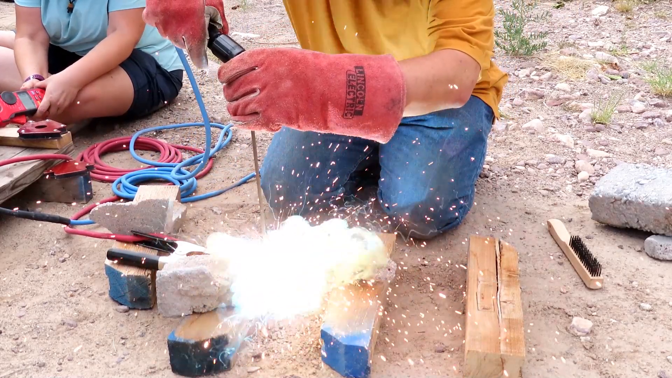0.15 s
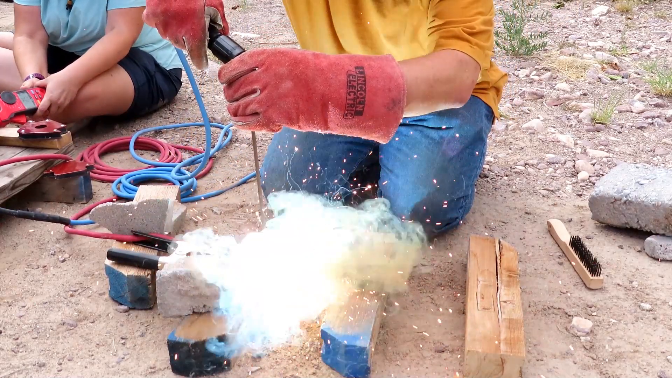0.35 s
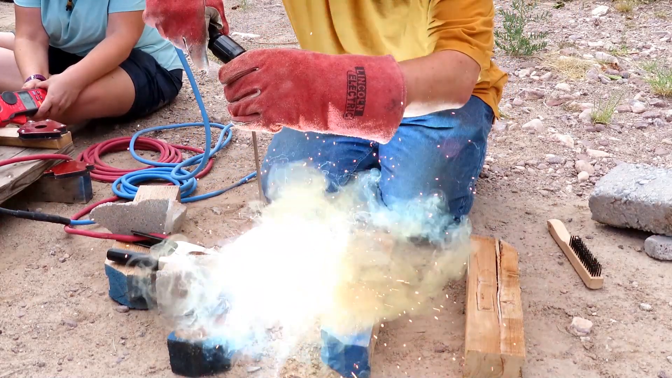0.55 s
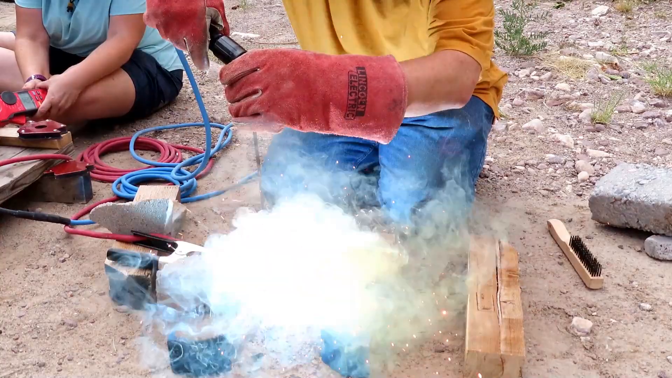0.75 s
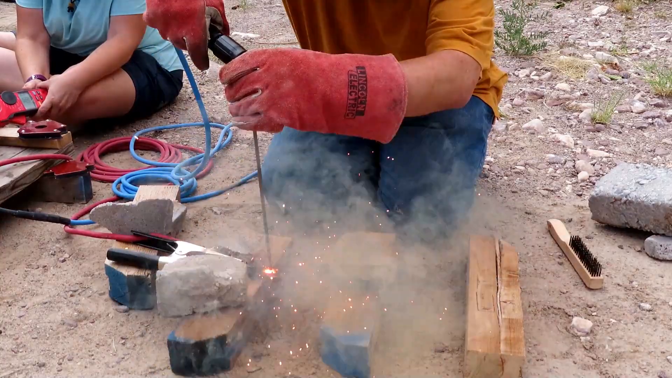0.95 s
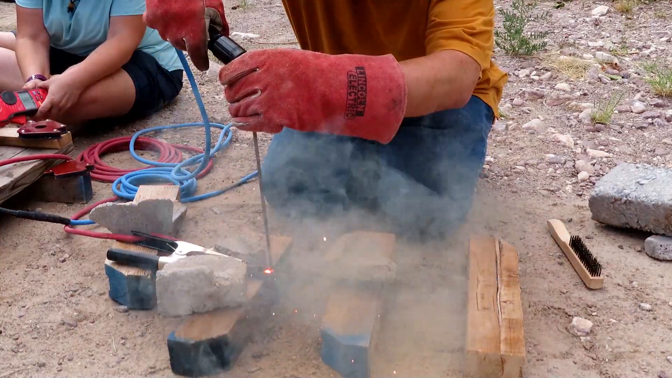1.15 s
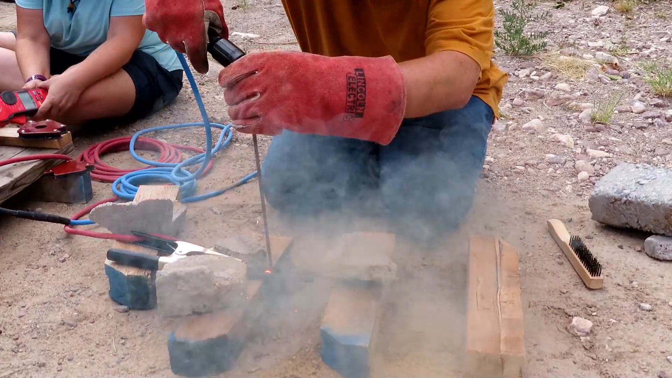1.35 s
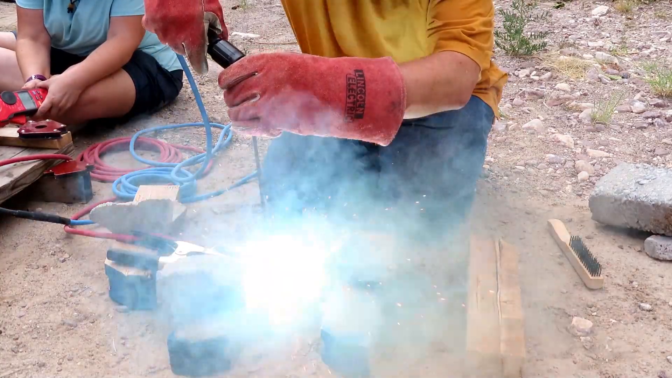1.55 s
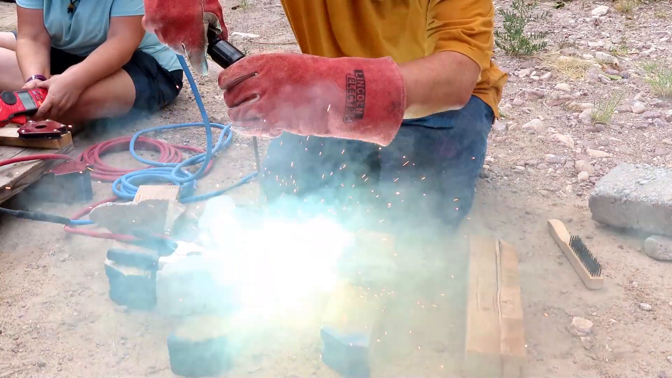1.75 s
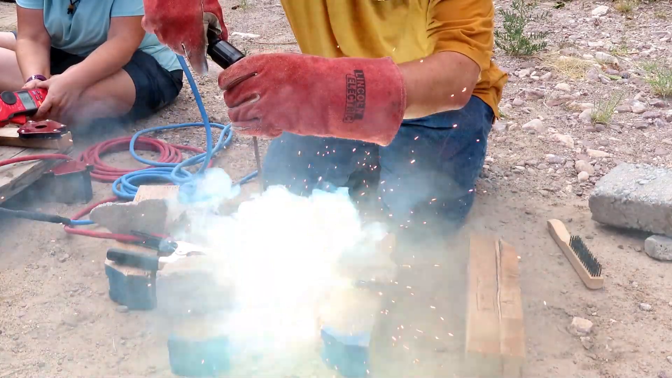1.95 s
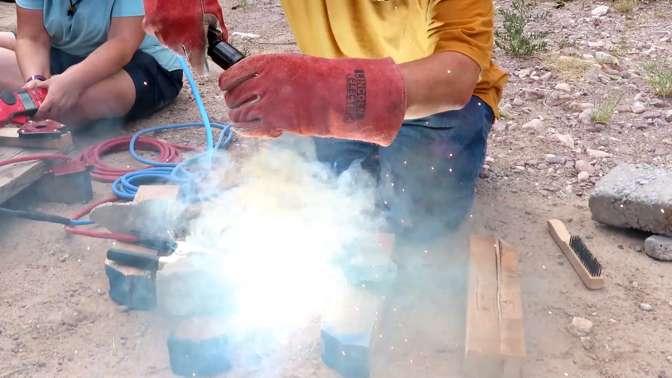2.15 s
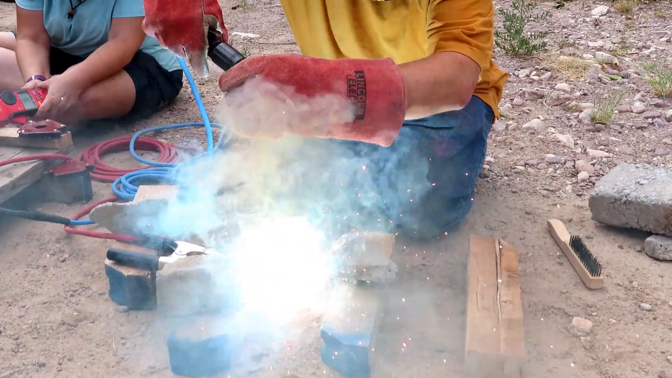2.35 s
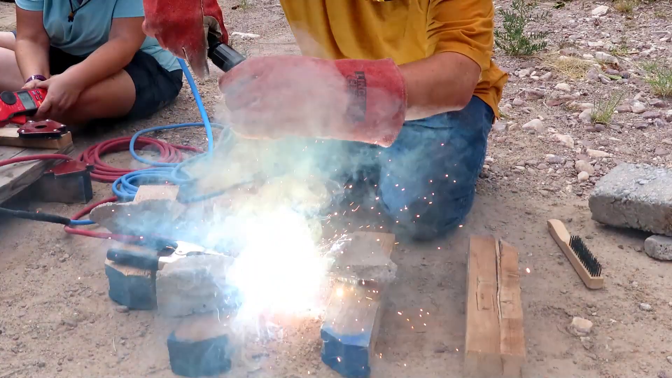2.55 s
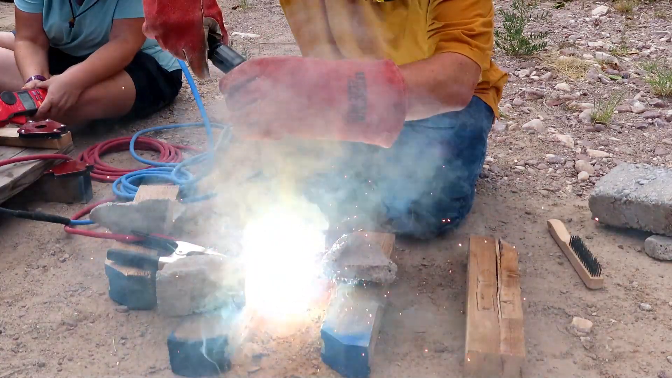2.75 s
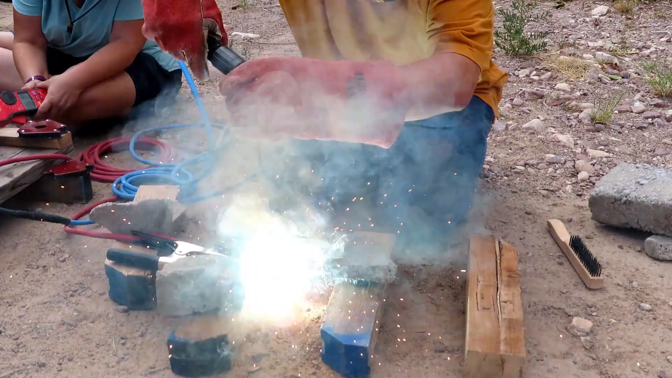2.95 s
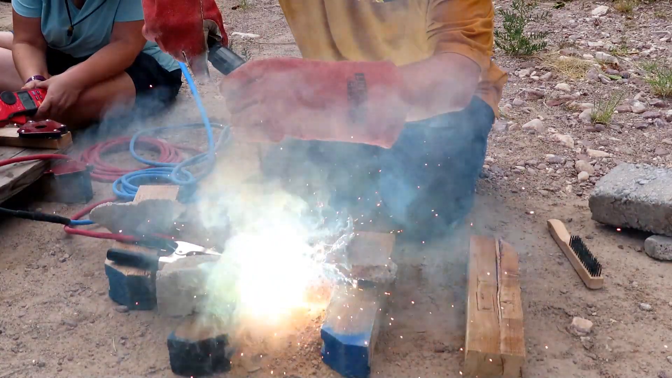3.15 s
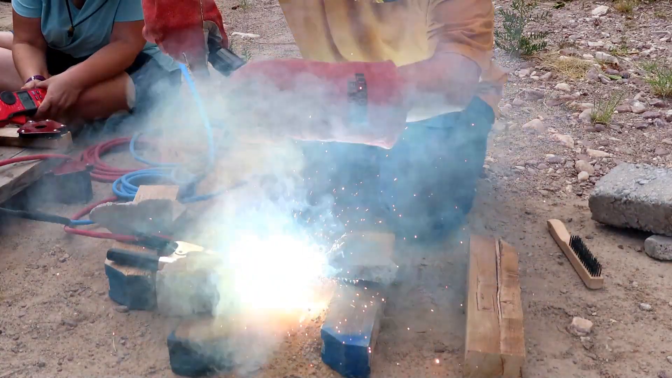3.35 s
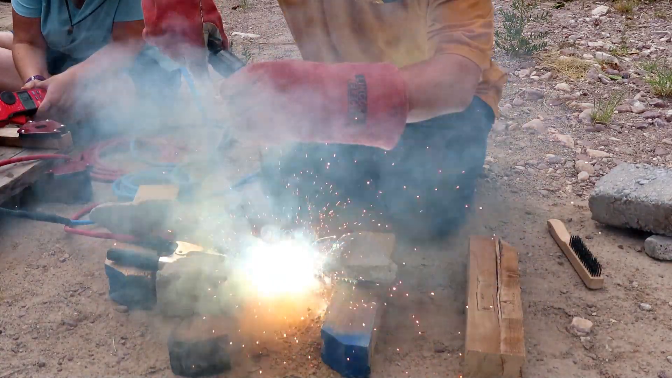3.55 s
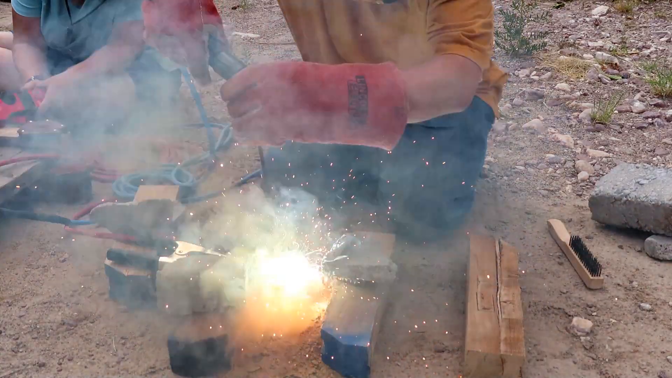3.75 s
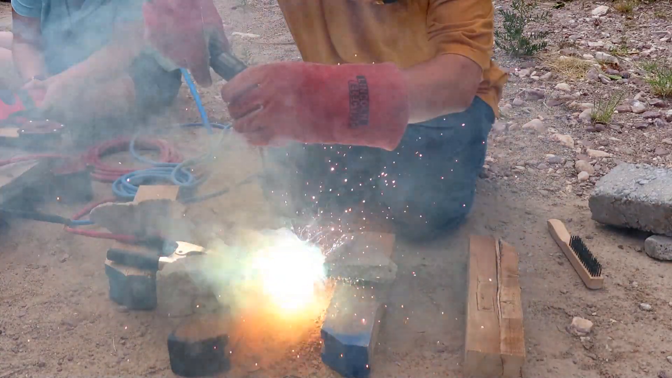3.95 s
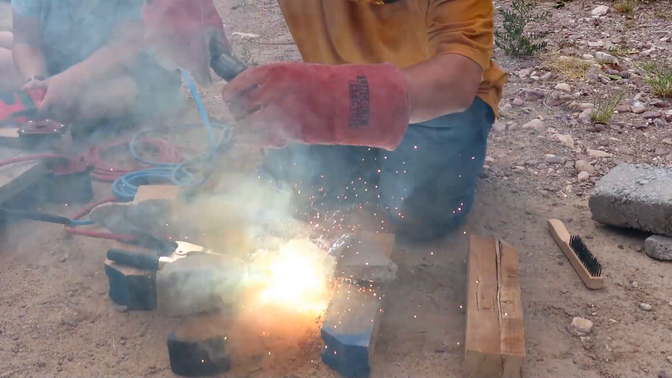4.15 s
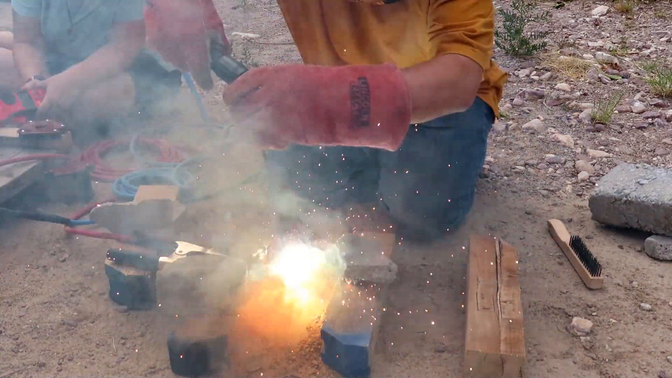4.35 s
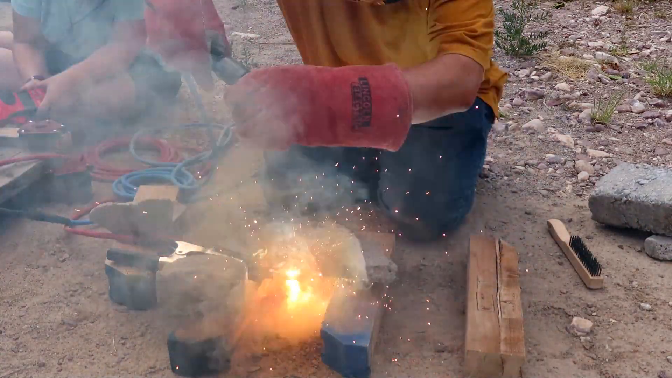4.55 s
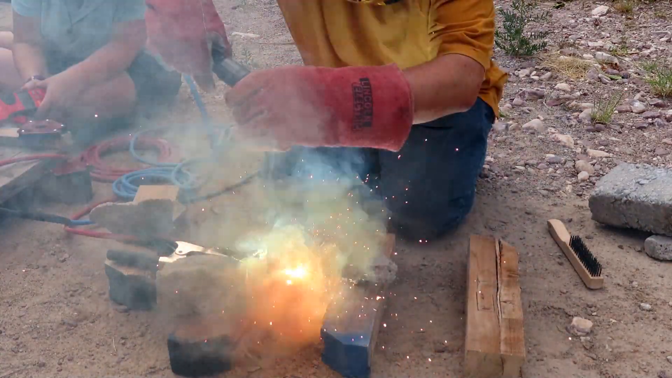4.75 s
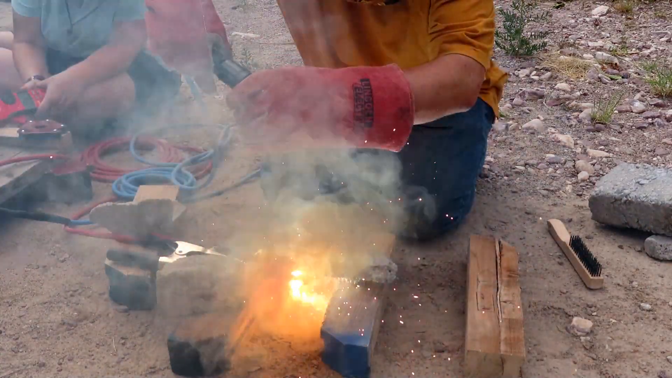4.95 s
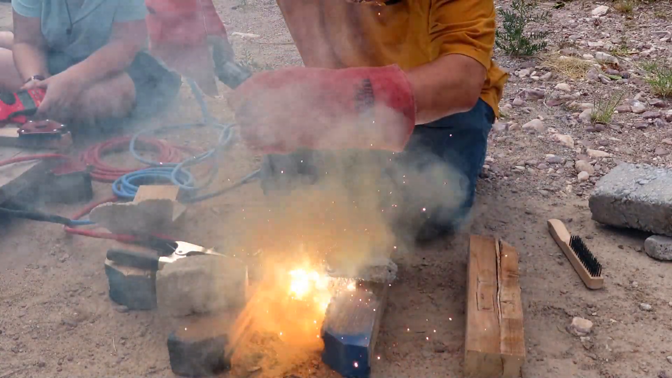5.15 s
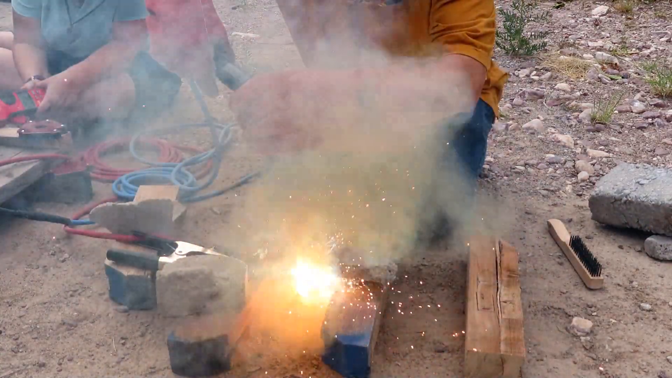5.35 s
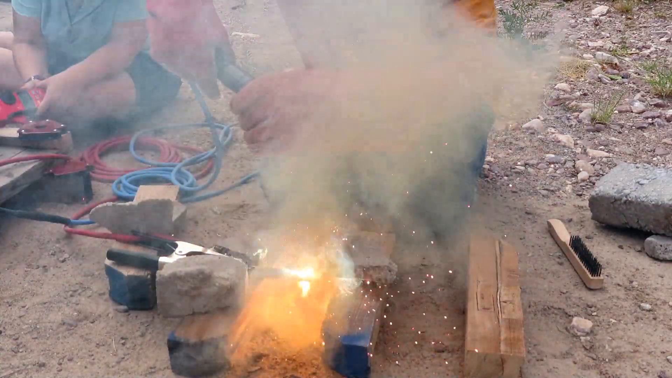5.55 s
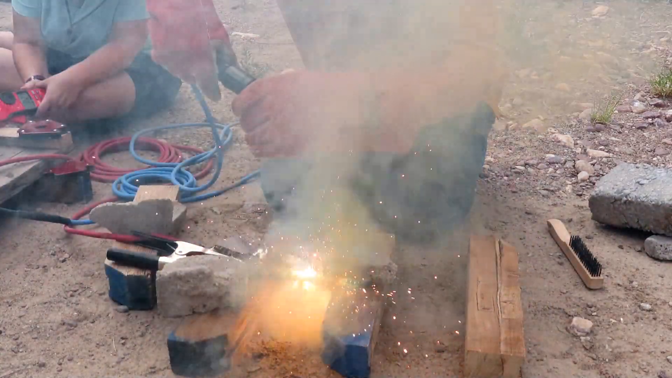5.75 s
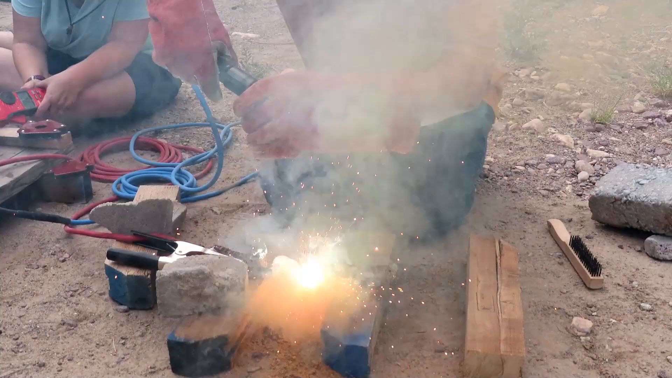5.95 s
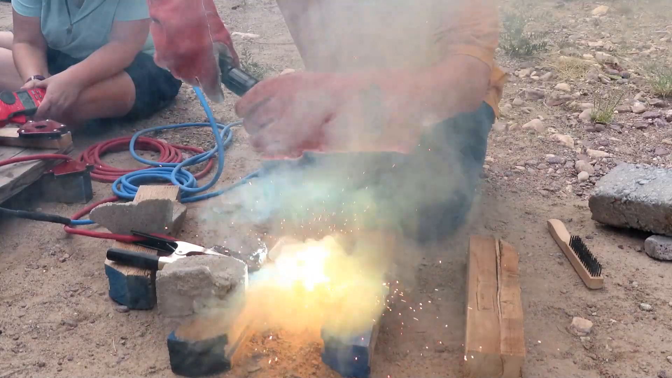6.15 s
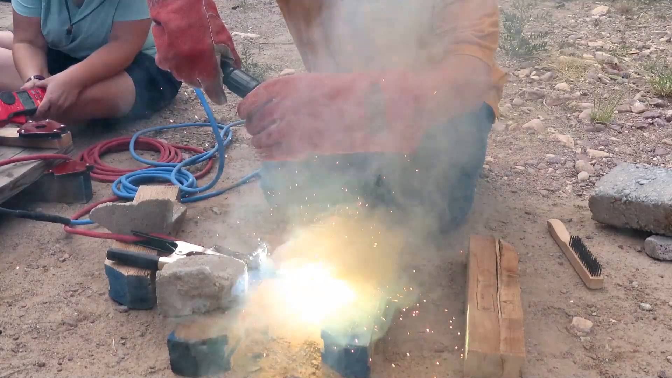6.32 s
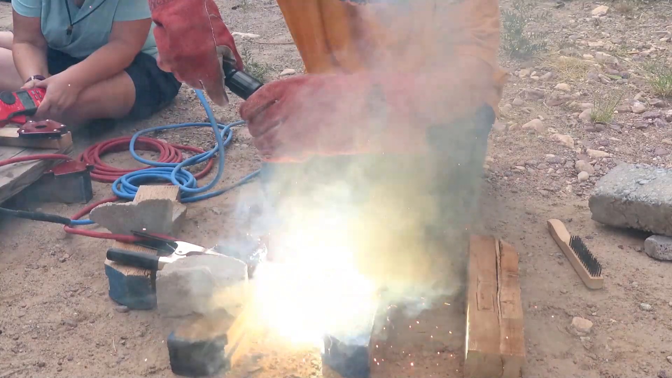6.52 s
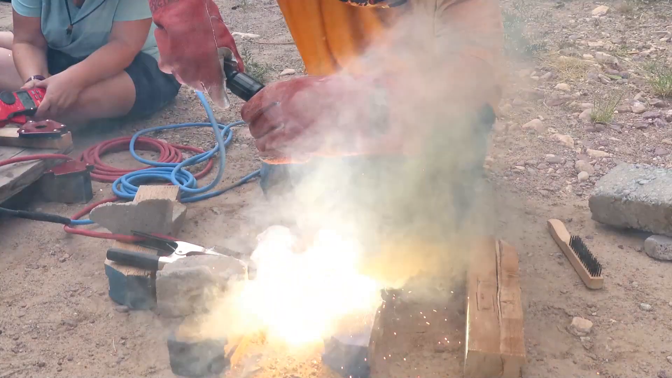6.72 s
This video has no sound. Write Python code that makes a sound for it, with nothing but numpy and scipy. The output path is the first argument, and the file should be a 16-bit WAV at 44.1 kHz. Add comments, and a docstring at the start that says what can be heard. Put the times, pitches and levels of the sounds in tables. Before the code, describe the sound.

An electric welding arc fizzes and crackles harshly up close outdoors, pops out, restrikes after half a second, then fries on steadily with spits.

```python
"""Stick welding outdoors

Steel bars between bricks on bare ground are welded a step or two away, over air and a low drone.
Dense random discharges drive fizz, crackle and a hollow roar; flutter, spits and shorts vary their level.
The arc goes out with a pop, is struck again and settles into a steady frying. Pops are short blasts with
spray and gas; echoes and scatter place arc and pops in the yard."""
import sys
import numpy as np
from scipy import signal
from scipy.fft import rfft, irfft
from scipy.io import wavfile
from scipy.ndimage import uniform_filter1d

SR = 44100
rng = np.random.default_rng(int(sys.argv[2]) if len(sys.argv) > 2 else 0)


def log_audio(samples):
    """Write samples as a 16-bit WAV file to the path given in sys.argv[1]."""
    # one column per channel
    frames = np.atleast_2d(samples).T
    # limit to full scale, then quantise
    limited = np.clip(frames, -1, 1)
    pcm = np.round(limited * 32767).astype(np.int16)
    wavfile.write(sys.argv[1], SR, pcm)


N = 303408
TIME = np.arange(N) / SR

# Colour of the arc. Each row: frequency in Hz, relative gain in dB.
ARC_COLOUR = [(30, -51), (70, -6.5), (110, -2.5), (160, -2), (270, 1.5), (390, 2), (600, 7.5), (950, 2),
              (1900, 0.5), (3300, -4), (5000, -4.5), (8000, -7.5), (12500, -9.5), (16000, -17)]
# Hollow between bricks and ground. Each row: resonance in Hz, width in Hz, relative gain in dB.
HOLLOW_MODES = [(197, 95, 5), (322, 35, -7.5), (474, 133, -3.5), (661.5, 48, 8.5), (876, 31, 1)]


def amp(db):
    """Decibels to gain."""
    return 10 ** (np.asarray(db) / 20)


def evened(x):
    """Scales to rms 1."""
    return x / np.sqrt(np.mean(x ** 2) + 1e-20)


def read(points, hz):
    """Reads a spectrum table on a log-frequency axis."""
    f, value = np.transpose(points)
    return np.interp(np.log(hz + 1), np.log(f + 1), value)


def curves(rows):
    """Every column of a timed table, sample by sample."""
    s, *columns = np.transpose(rows)
    return [np.interp(TIME, s, c) for c in columns]


def wander(lo_hz, hi_hz):
    """Random motion of rms 1, mostly between two rates."""
    hz = np.fft.rfftfreq(N, 1 / SR)
    weight = hz / (hz + lo_hz) / (1 + (hz / hi_hz) ** 2)
    return evened(irfft(rfft(rng.standard_normal(N)) * weight, N))


def coloured(x, points, size=4096):
    """Minimum-phase filter with the given spectrum: clicks keep their sharp fronts."""
    log_gain = np.log(amp(read(points, abs(np.fft.fftfreq(size, 1 / SR)))))
    taps = np.fft.ifft(np.exp(np.conj(signal.hilbert(log_gain)))).real
    return signal.oaconvolve(x, taps[:size // 2])[:N]


def below(x, hz, order=3):
    """Low-pass without delay, so that bands add up again."""
    sos = signal.butter(order, hz, fs=SR, output="sos")
    return signal.sosfiltfilt(sos, x, padtype=None)


def resonate(x, hz, width_hz):
    """A resonance of gain 1 that can follow a moving frequency."""
    turn = np.exp(2j * np.pi * np.cumsum(hz * np.ones(N)) / SR)
    r = np.exp(-np.pi * width_hz / SR)
    return 2 * (turn * signal.lfilter([1 - r], [1, -r], x / turn + 1e-18)).real


def in_hollow(x):
    """Parallel resonances of the hollow between bricks and ground."""
    return sum(amp(db) * resonate(x, hz, width_hz) for hz, width_hz, db in HOLLOW_MODES)


def add(mix, s, sound):
    """Lays a sound into the mix at s seconds."""
    part = mix[max(round(s * SR), 0):][:len(sound)]
    part += sound[:len(part)]


def chance(per_s):
    """Unit clicks at random moments."""
    return 1. * (rng.random(N) < per_s / SR)


def spells_db(rows):
    """A level that holds each row's dB for its length, with edges of a few milliseconds."""
    steps_db = sum(db * ((TIME > s) & (TIME < s + length_s)) for s, length_s, db in rows)
    return uniform_filter1d(steps_db, size=200)


def background():
    """Outdoor air as coloured noise, a drone of wavering harmonics that throbs the air, and a steady hiss."""
    # Each row: frequency in Hz, relative gain in dB.
    air_colour = [(20, -2), (45, -15), (85, -1.5), (150, -19.5), (190, -15.5), (270, -27.5), (900, -29.5),
                  (1800, -36.5), (2900, -48.5), (4200, -51), (6000, -63.5), (15000, -74.5)]
    # Each row: multiple of the throb rate, rms level in dB.
    drone_partials = [(3, -61), (4, -69.5), (5, -70.5)]
    air_db, hiss_db = -53, -83
    throb_hz, throb_depth, waver = 23.06, 0.4, 0.017
    turn = 2 * np.pi * np.cumsum(throb_hz * (1 + waver * wander(0.41, 5.9))) / SR
    air = amp(air_db) * evened(coloured(rng.standard_normal(N), air_colour))
    throb = throb_depth * np.cos(turn) * below(air, 700)
    drone = sum(amp(db) * evened(np.sin(round(k) * turn + 2 * np.pi * rng.random()))
                for k, db in drone_partials)
    return air + throb + drone + amp(hiss_db) * rng.standard_normal(N)


def scatter(t60_s):
    """A quick spray of small reflections, energy 1; small things scatter only short waves."""
    t = np.arange(SR // 10) / SR
    hits = rng.random(len(t)) < .1
    taps = rng.standard_normal(len(t)) * hits * (t > .0005) * amp(-60 * t / t60_s)
    taps = taps - below(taps, 2200, order=2)
    return taps / np.linalg.norm(taps)


def yard(x):
    """Echoes off bricks, ground and welder, a shifting scatter around them, and a faint outdoor tail."""
    # Nearby surfaces. Each row: delay in seconds, reflected share before the low-pass.
    surfaces = [(.0046, 0.16), (.0058, 0.15), (.0064, 0.36)]
    # Each row: frequency in Hz, decay time t60 in seconds.
    tail_decay = [(150, .3), (1000, 0.32), (4000, .22), (10500, .25), (15000, .23)]
    near_db, near_t60_s, drift_hz = -8.5, 0.074, 0.609
    tail_db, echo_hz = -21, 1500
    t = np.arange(SR // 2) / SR
    hz, frame_s, z = signal.stft(rng.standard_normal(len(t)) * (t > .012), SR, nperseg=256)
    decay = amp(-60 * frame_s / read(tail_decay, hz)[:, None])
    tail = signal.istft(z * decay, SR, nperseg=256)[1][:len(t)]
    echoes = np.zeros(len(t))
    for delay_s, share in surfaces:
        add(echoes, delay_s, np.array([share]))
    # rough surfaces mirror only the long waves
    response = below(echoes, echo_hz, order=1) + amp(tail_db) * tail / np.linalg.norm(tail)
    response[0] += 1  # direct sound
    # the short paths change as the arc and the gloves move: two scatters in rotation
    turn = 2 * np.pi * drift_hz * TIME
    near = sum(weight * signal.oaconvolve(x, scatter(near_t60_s))[:N]
               for weight in (np.cos(turn), np.sin(turn)))
    far = signal.oaconvolve(x, response)[:N]
    return (far + amp(near_db) * near) / np.hypot(1, amp(near_db))


def pops():
    """A drop bursts: a small blast wave, a puff of spray and a thud of gas, which ring the hollow."""
    # Each row: start in seconds, blast peak in dB, pulse width in seconds, spray in dB, thud in dB;
    # levels are before the arc colour.
    bursts = [(1.0219, -15, .000083, -24, -49), (1.035, -13, 0.00016, -18.5, -33),
              (1.105, -50, .00005, -49, -70), (2.165, -2, 0.00025, -10, -23),
              (2.7048, -34, 0.00022, -14, -42), (3.399, -20, 0.000072, -15, -46),
              (3.442, -18, 0.00011, -18, -43), (5.6245, -24, .00034, -18, -36)]
    ring_db, puff_s, thud_s, thud_hz = -6, 0.0022, 0.0051, 420
    out, t = np.zeros(N), np.arange(SR // 30) / SR
    for s, peak_db, width_s, spray_db, thud_db in bursts:
        blast = amp(peak_db) * (1 - t / width_s) * np.exp(-t / width_s)
        spray, gas = rng.standard_normal((2, len(t)))
        spray = amp(spray_db) * spray * np.exp(-t / puff_s)
        gas = evened(below(gas * np.minimum(t / .001, 1), thud_hz))
        thud = amp(thud_db) * gas * np.exp(-t / thud_s)
        add(out, s, blast + spray + thud)
    out = coloured(out, ARC_COLOUR)
    return out + amp(ring_db) * in_hollow(out)


def choke_db():
    """How far molten drops bridging the gap pull the arc down; the bridge trembles while it lasts."""
    # Large drops. Each row: start in seconds, length in seconds, mean depth in dB before band scaling.
    large_shorts = [(0.298, .021, -3), (0.786, 0.049, -7.5), (0.996, 0.034, -9), (2.176, 0.032, -7),
                    (2.215, .044, -4), (2.392, .058, -3.5), (2.685, 0.021, -8.5), (2.844, 0.076, -5.5),
                    (3.368, 0.038, -5.5), (3.404, 0.029, -6.5), (3.72, 0.043, -5), (4.079, .019, -6),
                    (4.939, 0.036, -5.8), (5.269, 0.041, -6.5), (5.604, 0.017, -11.5), (5.628, 0.048, -6.5),
                    (5.906, .048, -4.5), (6.611, .056, -8)]
    small_per_s, small_half_length_s, small_db = 1.5, 0.024, -1
    dip_shape = np.hanning(round(2 * small_half_length_s * SR))
    small = signal.oaconvolve(chance(small_per_s), dip_shape)[:N]
    tremble = np.clip(1 + 0.6 * wander(60, 240), 0, 1.3)
    return np.minimum(spells_db(large_shorts), small_db * small) * tremble


def vigour():
    """Strength of the arc: it flutters with the molten pool, swells in flurries and flares on each spit."""
    # Each row: time of full strength in seconds, time out in seconds.
    lit_spans = [(-1, 1.038), (1.562, 8)]
    # Uneven holding of the rod. Each row: time in seconds, signed flutter depth in dB rms.
    sputter = [(0, .8), (.7, 3.5), (1.04, 5), (1.6, -2.2), (2.1, 2.5), (2.7, 4), (3.8, 3.5), (6.88, 2.5)]
    # Harder or softer crackle. Each row: start in seconds, length in seconds, change in dB.
    flurries = [(.165, 0.11, 3.5), (.64, .035, 3.5), (.745, .035, 3), (2.01, 0.036, 2.5),
                (2.315, 0.093, 2.5), (2.475, .05, 3), (3.03, 0.028, 1.5), (3.17, 0.023, 5.5),
                (3.285, .025, 5.5), (4.415, 0.037, 3), (4.83, .1, 1.5), (5.55, 0.057, -1.5),
                (6.73, .08, 2.5)]
    # Single spits of metal, strong and faint. Each row: time in seconds, level in dB before spit_gain_db.
    timed_spits = [(.338, 3.5), (.538, 3.5), (.776, 2.5), (.845, 9), (0.931, 0), (1.616, 7.5), (1.923, 7.5),
                   (2.142, 6.5), (2.347, 10), (2.619, 5.5), (2.654, 9), (2.807, 5), (2.828, 6.5),
                   (3.142, 6.5), (3.19, 4), (3.249, 7), (3.305, 4), (3.358, 13), (3.45, 11), (3.703, 11.5),
                   (3.898, 5), (4.02, 5.5), (4.072, 6.5), (4.436, 5), (4.852, 0), (5.569, 3.5), (6.305, 8),
                   (6.598, 4), (6.753, 7.5), (6.799, 7)]
    catch_db_per_s, surge_db = 2301, 0.79
    spit_s, spit_gain_db = 0.0016, 1.6
    small_spits_per_s, small_spit_db = 22, 3.5
    lit = sum(amp(np.clip(catch_db_per_s * (TIME - on), -120, 0)) * (TIME < off) for on, off in lit_spans)
    flutter_db = curves(sputter)[0] * wander(130, 380) + surge_db * wander(8.8, 30)
    flutter = evened(amp(flutter_db)) * amp(spells_db(flurries))
    flare = np.exp(-(np.arange(SR // 40) / SR / spit_s - 2) ** 2)
    small_spits = signal.oaconvolve(chance(small_spits_per_s), flare)[:N]
    spits = amp(small_spit_db) * np.minimum(small_spits, 1)
    for s, db in timed_spits:
        add(spits, s - 1.5 * spit_s, amp(db + spit_gain_db) * flare)
    return np.maximum(flutter, spits) * uniform_filter1d(lit, size=60)


def discharges():
    """Tiny pressure steps of uneven size, with turbulent hiss between them."""
    per_s, spread_db, hiss_db = 6000, 2.5, -3
    size = amp(spread_db * np.minimum(rng.exponential(1, N), 3.5))
    sparks = evened(size * rng.choice([-1, 1], N) * chance(per_s))
    return evened(sparks + amp(hiss_db) * rng.standard_normal(N))


def gas_roar(gas, puffing_db, hollow_db):
    """Low band of the discharges: hot gas puffs and rings the hollow, whose upper ring opens as the rod digs in."""
    upper_hz, upper_width_hz, upper_db = 770, 110, -5
    upper_opening = np.interp(TIME, (3, 5.7), (0, 1))
    roar = below(gas, 760) + (amp(puffing_db) - 1) * below(gas, 140)
    roar += amp(hollow_db) * below(in_hollow(gas), 830)
    return roar + amp(upper_db) * upper_opening * resonate(gas, upper_hz, upper_width_hz)


def mid_crackle(sizzle, fizz):
    """Middle band of the discharges, with a dip that drifts upward."""
    # Each row: time in seconds, frequency in Hz, depth 0-1.
    drifting_dip = [(0, 750, 0.15), (2.4, 850, 0), (3.4, 1080, 0.5), (4.6, 1260, 0.33), (5.5, 1600, 0.5),
                    (6.3, 1745, .35), (6.88, 2150, 0.8)]
    crackle = sizzle - fizz - below(sizzle, 1048)
    dip_hz, depth = curves(drifting_dip)
    return crackle - depth * resonate(crackle, dip_hz, 540)


def peaked_fizz(fizz, sheen_db):
    """Treble of the discharges: three broad peaks drift as the rod burns down and waver with its molten tip."""
    # Each row: time in seconds, strength of the low peak 0-1, low, middle and high peak in Hz.
    hiss_peaks = [(0, 0.75, 4200, 7650, 10600), (1.95, .4, 4200, 7750, 10500), (2.15, .5, 4400, 6650, 9300),
                  (3.5, 0.9, 4950, 7050, 9500), (3.8, 0.6, 5050, 7900, 10300),
                  (4.5, 0.3, 5200, 8200, 10600), (4.85, .9, 6250, 8250, 11200), (5.4, 1, 6650, 8400, 12000),
                  (6.1, .5, 7000, 8600, 11200), (6.4, .6, 4200, 8300, 11200), (6.88, .9, 4050, 8250, 11300)]
    width_hz, waver_db, waver = 600, 2.0, 0.03
    low_share, *peaks_hz = curves(hiss_peaks)
    low, middle, high = (amp(waver_db * wander(2, 13))
                         * resonate(fizz, hz * (1 + waver * wander(2, 16)), width_hz)
                         for hz in peaks_hz)
    fizz = fizz + low_share * low + middle + high
    return fizz + (amp(sheen_db) - 1) * (fizz - below(fizz, 9100))


def arc():
    """One train of discharges, split into gas roar, crackle and fizz, each with its own level curve."""
    # Narrow peaks and notches. Each row: frequency in Hz, width in Hz, change in gain.
    sizzle_colour = [(2344, 160, -0.17), (3020, 160, -.35), (3130, 140, 0.42), (3450, 260, -0.076),
                     (5800, 360, -0.24)]
    # Flame colour. Each row: time in seconds, hollow ring in dB, deep puffing in dB, finest fizz in dB.
    flame = [(0, -4.5, 10.5, 4.5), (1, -11.5, -3.5, -2), (1.6, 2, 3.5, 5.5), (2.1, -10, 10, 3.5),
             (2.4, -12, 7, 0), (3.2, -3, 5.5, -1), (3.9, -7.5, -9.5, -1), (5.6, -6, -12.5, 1),
             (6.3, -3, -4.5, 1), (6.88, -9, 6, 0)]
    # First arc starts strong, weakens and starves; second catches, sputters, digs in and roars. Each row:
    # time in seconds, fizz in dB, crackle and gas roar in dB over the fizz; all before the trims.
    first_burn = [(0, -24, -0.5, -5), (.24, -30.5, -2, -0.5), (.48, -29, -2, -3.5), (.68, -31, 0.5, 0.5),
                  (.88, -33, -3.7, -4), (1.04, -35, 3.5, 1.5)]
    second_burn = [(1.56, -36, -1.5, 0.5), (1.72, -31, -4.5, -6.5), (1.98, -32, 0.8, 1),
                   (2.402, -31.5, -3.5, -3), (2.72, -32.5, -4, -6), (2.95, -29, -2, -4),
                   (3.199, -33, -2.5, -3.5), (3.52, -32, -1, -1.5), (3.88, -27, -5, -2.8),
                   (4.251, -29, -4.5, -0.3), (4.701, -27.5, -5.5, 0.1), (5.2, -28, -6.5, -1.5),
                   (5.6, -28, -4.5, 0), (5.88, -25.5, -7, -4), (6.2, -28, -6, -2.6),
                   (6.5, -26.5, -5.5, -1.8), (6.88, -31.5, -2, 4.5)]
    fizz_trim_db, crackle_trim_db, roar_trim_db, shimmer_db = 0.24, -1.0, -0.8, 1.84
    drive, choke = discharges() * vigour(), choke_db()
    # shorts cut the sizzle more deeply than the roar of the hot gas
    sizzle = coloured(drive * amp(1.37 * choke), ARC_COLOUR)
    gas = coloured(drive * amp(choke), ARC_COLOUR)
    sizzle = sizzle + sum(change * resonate(sizzle, hz, width_hz) for hz, width_hz, change in sizzle_colour)
    hollow_db, puffing_db, sheen_db = curves(flame)
    roar = gas_roar(gas, puffing_db, hollow_db)
    fizz = sizzle - below(sizzle, 2880)
    crackle = mid_crackle(sizzle, fizz)
    fizz = peaked_fizz(fizz, sheen_db)
    level_db, crackle_db, roar_db = curves(first_burn + second_burn)
    fizz = amp(fizz_trim_db + shimmer_db * wander(30, 130)) * evened(fizz)
    crackle = amp(crackle_db + crackle_trim_db + shimmer_db * wander(30, 110)) * evened(crackle)
    roar = amp(roar_db + roar_trim_db) * evened(roar)
    return amp(level_db) * (fizz + crackle + roar)


def scene():
    """The arc and its pops in the yard, over the background."""
    return (yard(arc() + pops()) + background())[None]


def record(dry):
    """Rounds off the highest peaks, then limits the band."""
    ceiling, edge_hz = 0.39, 15900
    soft = ceiling * np.tanh(dry / ceiling)
    edge = signal.firwin(511, edge_hz, window=("kaiser", 9), fs=SR)
    return signal.oaconvolve(soft, edge[None], "same")


dry = scene()
out = record(dry)
log_audio(out)
```